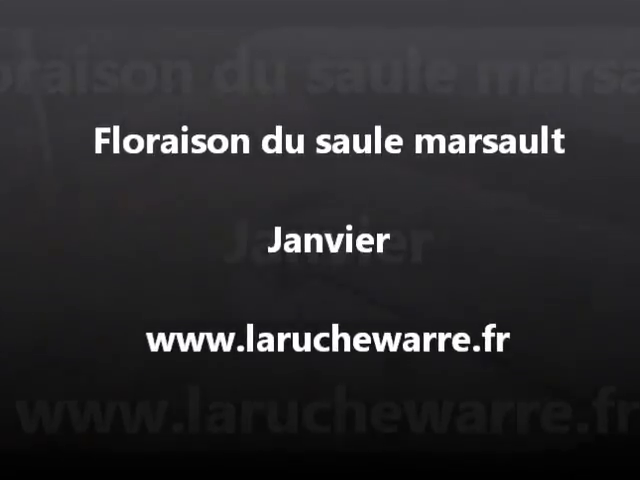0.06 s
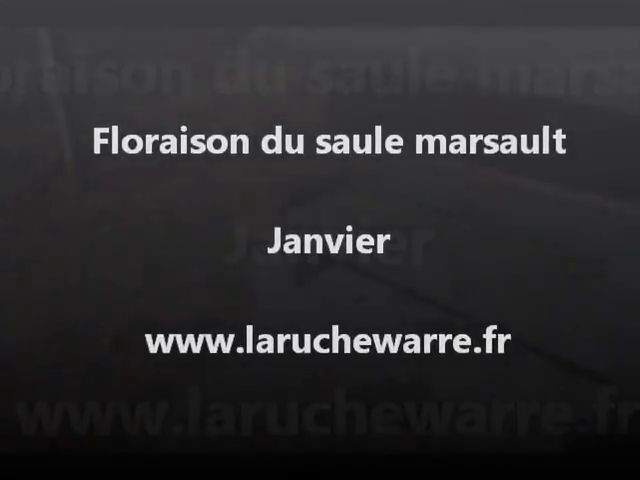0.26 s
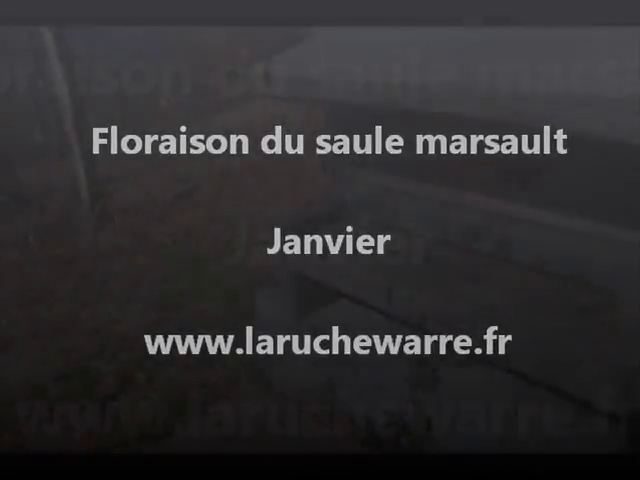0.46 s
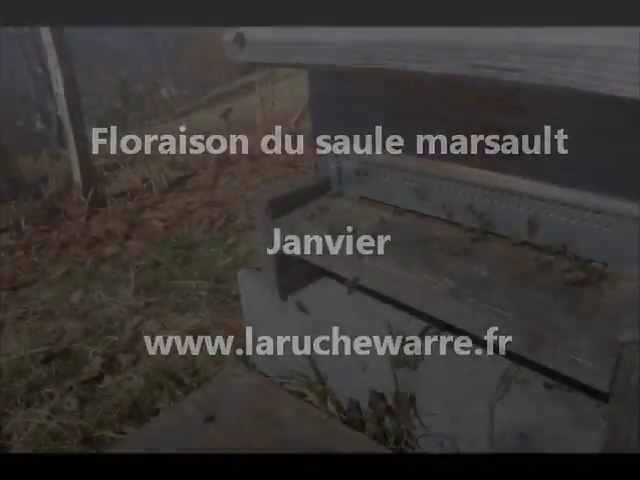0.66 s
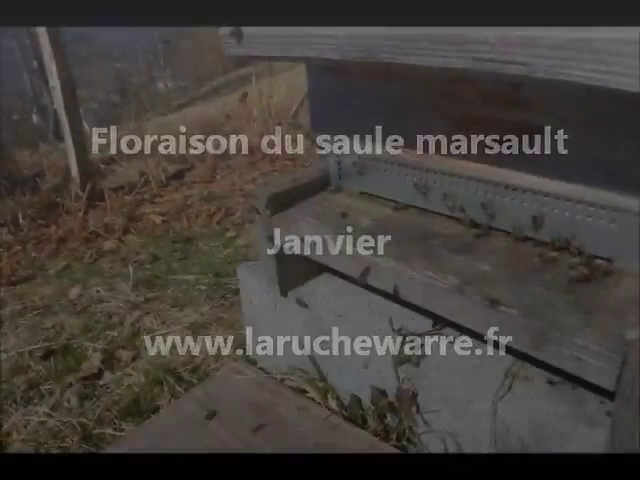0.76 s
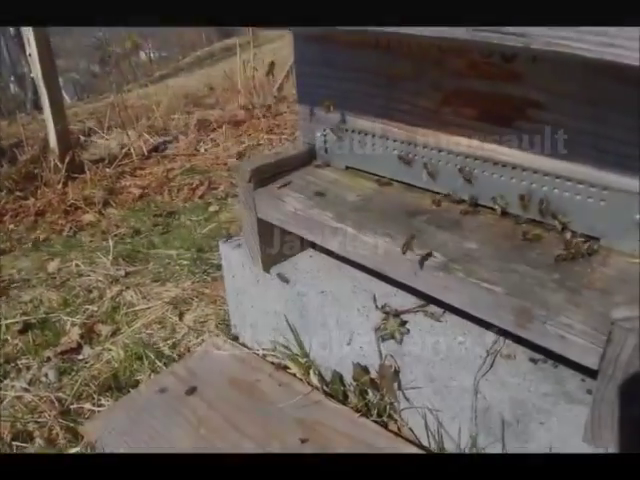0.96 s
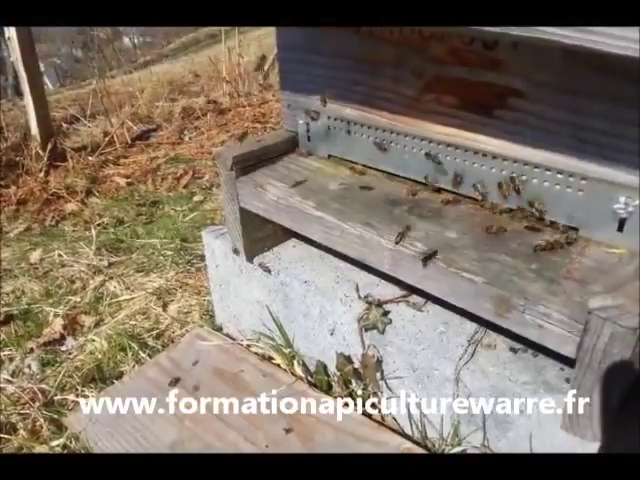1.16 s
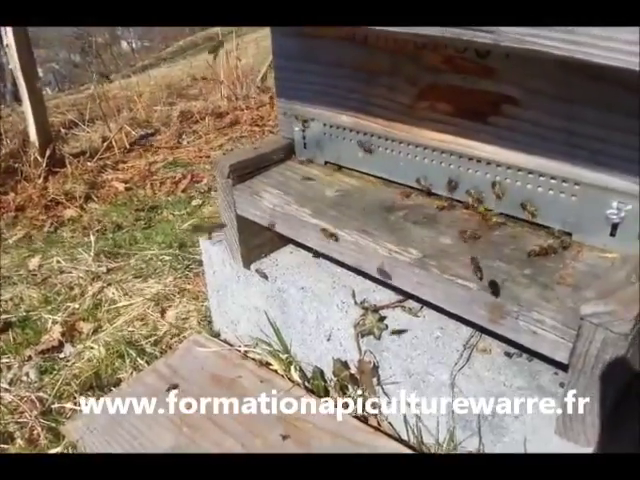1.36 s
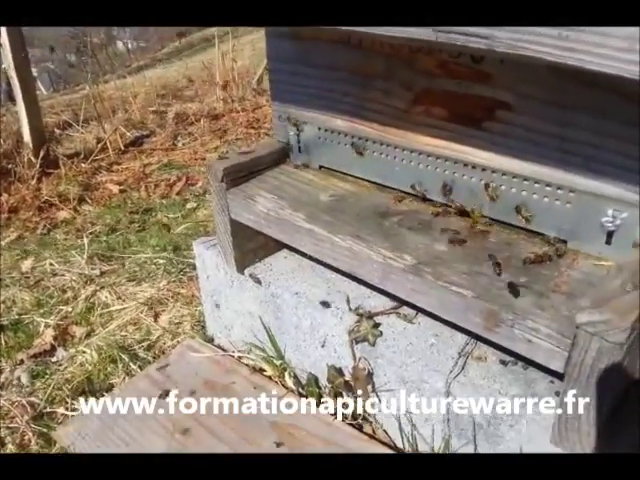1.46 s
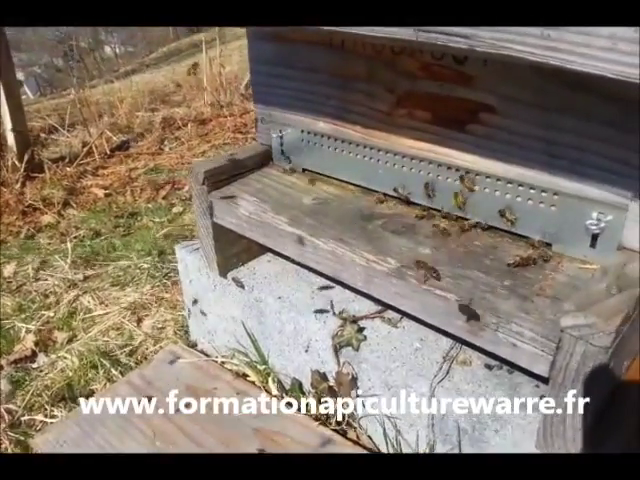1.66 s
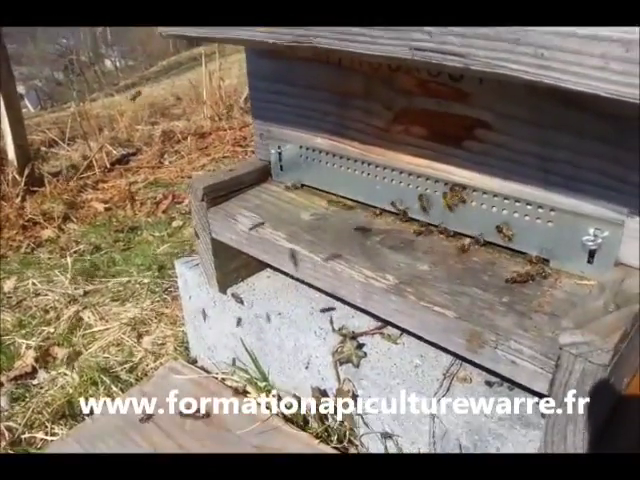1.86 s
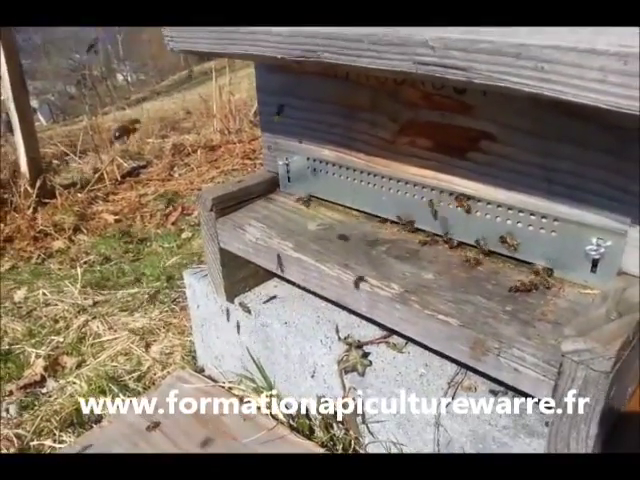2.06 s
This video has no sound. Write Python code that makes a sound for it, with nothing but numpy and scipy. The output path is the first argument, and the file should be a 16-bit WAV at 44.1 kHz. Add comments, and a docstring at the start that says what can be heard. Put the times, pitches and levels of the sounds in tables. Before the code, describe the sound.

Honeybees hum steadily at a wooden hive entrance outdoors, one hovering close and sinking in pitch. Early on, fingers brush, click and rub on the hand-held camera, while light gusts rumble on the microphone over faint hiss.

```python
"""A soft brush on the left and sharp plastic snaps, then honeybees humming at a wooden hive's entrance.
Each bee is a stack of wingbeat harmonics; one hovers close, sinking in pitch, and another joins late.
Fingers click, bump and slide on a small hand-held camera, and puffs of breeze buffet its two microphone
ports. Each port has its own treble resonance, which colours the snaps, the rubbing and the outdoor hiss.
"""
import sys
import numpy as np
from scipy import signal
from scipy.fft import rfft, irfft, next_fast_len
from scipy.io import wavfile
from scipy.ndimage import uniform_filter1d, map_coordinates

SR = 44100
rng = np.random.default_rng(int(sys.argv[2]) if len(sys.argv) > 2 else 0)


def output_pcm(signal):
    """Save a mono or channel-first signal as 16-bit PCM at the path in sys.argv[1].

    Samples are clipped to [-1, 1] before scaling.
    """
    pcm = np.clip(np.atleast_2d(signal).T, -1, 1) * 32767
    wavfile.write(sys.argv[1], SR, np.round(pcm).astype(np.int16))


N = 92610

# fader ride of the colony: t/s, level/dB
COLONY_RIDE = [(.05, -76), (.22, -51.5), (.6, -56), (.82, -53), (.97, -60.5), (1.12, -53), (1.35, -54.5),
               (1.57, -55.5), (1.66, -52.5), (1.9, -57.5), (2.1, -57.5)]
# the nearest bee: t/s, wingbeat/Hz, level/dB
NEAR_FLIGHT = [(.1, 263.8, -68), (.22, 262.3, -66.5), (.48, 271.6, -68), (.56, 278.6, -57),
               (.86, 276.6, -59.5), (1.03, 277.2, -67), (1.27, 266.4, -58.5), (1.45, 259.4, -60.5),
               (1.7, 238.9, -63.5), (1.9, 227.8, -59), (2.02, 225, -59), (2.1, 218.5, -82)]
# a second close bee flying in late: t/s, wingbeat/Hz, level/dB
LATE_FLIGHT = [(1.75, 288, -74), (1.95, 291.6, -69.5), (2.1, 289.7, -60.5)]
# balance of the wing harmonics: f/Hz, level/dB
WING_EQ = [(200, -4), (270, -3), (330, 12), (420, 1.5), (540, 4), (680, -3.5), (900, -3.5), (1250, -3),
           (1650, -9.5), (2200, -18.5), (4000, -21.5), (7000, -26)]
# snaps of the plastic case: t/s, left/dB, right/dB, knock send/dB, ring/Hz
SNAP_CUES = [(.2016, -4.5, -42, 4, 5370), (0.2357, -25.5, -19, -11, 6500), (0.2428, -17, -25.5, 7, 5700),
             (0.3124, -11.5, -13, 8, 7960), (0.3194, -26, -14, 6.5, 6760), (0.3666, -32, -23.5, 7, 6500),
             (0.3811, -20, -12, -10, 6300), (0.3832, -9, -10.5, 2.5, 6800), (0.3856, -9, -1, 4, 6000),
             (0.3879, -1.5, -40, 10, 4500), (0.3982, -10, -10, 14, 7300), (.3996, -14, -28, 20, 4600)]
# bright edge of a snap on the left: f/Hz, level/dB
SNAP_LEFT_EQ = [(200, -14.5), (1500, 0.5), (2500, 5.5), (4200, 7), (5700, 1), (7000, 6), (9500, 0.5),
                (13500, 7.5)]
# bright edge of a snap on the right: f/Hz, level/dB
SNAP_RIGHT_EQ = [(200, -39), (1500, -8), (3500, 5), (5500, 0.5), (7200, 2.5), (9000, 9), (10500, 5.5),
                 (13500, 5.5)]
# dull body under a snap: f/Hz, level/dB
KNOCK_EQ = [(40, -26), (300, 3.5), (800, -0.5), (1400, 0.5), (2600, -6), (8000, -21)]
# soft, low bumps on the right port: t/s, half-length/s, level/dB
THUMP_CUES = [(.4198, 0.0018, -20), (1.2305, 0.0063, -26.5), (1.630, 0.0027, -28), (1.797, 0.0048, -30.5),
              (1.9495, 0.0054, -30)]
# finger strokes on the case: t/s, half-length/s, left/dB, right/dB
RUB_CUES = [(.36, 0.05, -42.5, -45.5), (.51, 0.048, -47.5, -49), (.595, 0.033, -41.5, -42),
            (.68, 0.053, -52, -52), (.76, 0.033, -43.5, -44), (.83, 0.021, -52, -57),
            (.88, 0.0076, -52.5, -54.5), (1.04, 0.022, -60, -58.5), (1.113, 0.011, -50, -52),
            (1.33, 0.017, -60, -57), (1.475, 0.0081, -60, -54.5)]
# tone of skin on plastic: f/Hz, level/dB
RUB_EQ = [(100, -23), (400, 3.5), (800, 6), (1100, 5), (1700, 6.5), (2700, 4), (4200, -1), (7000, 0),
          (10000, -1), (14000, -5.5)]
# tone of the brush past the left port: f/Hz, level/dB
BRUSH_EQ = [(200, -18.5), (900, -4), (2300, -13.5), (3500, -4), (4600, 1), (5600, -5.5), (9000, -2.5),
            (14000, -17)]
# the hollow ringing under a sliding finger: t/s, half-length/s, f/Hz, level/dB
HOLLOW_CUES = [(0.607, 0.034, 2480, -48.5), (0.757, 0.021, 770, -49.5), (0.762, 0.018, 1610, -57.5),
               (0.837, 0.017, 600, -48)]
# puffs of breeze: t/s, half-length/s, left/dB, right/dB
PUFF_CUES = [(.305, 0.017, -47, -34.5), (.38, 0.022, -35, -31), (.425, 0.011, -41, -32.5),
             (.448, 0.015, -62, -37), (.57, 0.015, -67, -36.5), (.745, 0.024, -53, -39.5),
             (.838, 0.012, -57, -34), (1.058, 0.0089, -72, -45.5), (1.145, 0.019, -53, -44),
             (1.225, 0.029, -47, -39), (1.33, 0.031, -38, -42.5), (1.41, 0.013, -39, -48),
             (1.485, 0.017, -44, -55), (1.628, 0.011, -59, -39), (1.663, 0.016, -53, -39),
             (1.785, 0.027, -50, -42.5), (1.845, 0.013, -48, -38), (1.947, 0.015, -45.5, -40.5),
             (1.985, 0.023, -55, -43.5)]
# draught between the puffs: t/s, level/dB
DRAUGHT_RIDE = [(0, -86), (.3, -56.5), (1, -66), (1.25, -60), (2.1, -56)]
# rumble of wind on a port: f/Hz, level/dB
BUFFET_EQ = [(20, -6), (45, -4), (80, 4.5), (130, -1), (200, -6.5), (320, -19), (700, -17.5), (1500, -26),
             (3000, -53.5)]
# outdoor hiss: f/Hz, level/dB
AIR_EQ = [(25, 1), (70, -2.5), (150, -6.5), (330, -1.5), (700, -4.5), (1400, -0.5), (2300, -9), (5000, -12),
          (14000, -9)]
# response of the left microphone port: f/Hz, level/dB
LEFT_PORT_EQ = [(300, -11.5), (900, -14.5), (1500, -10), (2500, -12.5), (4200, -9.5), (4900, -5.5),
                (5450, 1.5), (6300, -6), (7500, -11), (10000, -17.5), (14000, -22)]
# response of the right microphone port: f/Hz, level/dB
RIGHT_PORT_EQ = [(300, -11), (900, -16.5), (1500, -15.5), (2500, -11.5), (4200, -7.5), (5800, -4),
                 (6600, 3), (7150, 5.5), (8200, -2.5), (10000, -9), (14000, -16)]


def colony(count=18, low_hz=202.86, high_hz=272.6, wander=.027, swerve_db=2, sag_per_s=.035):
    """Many bees wander in pitch and distance, blending into a hum that sinks a little."""
    hum = np.zeros((2, N))
    sag = 1 - sag_per_s * (clock() - clock().mean())
    for hz in np.linspace(low_hz, high_hz, count):
        nearness = amp(swerve_db * wobble(4.7))
        wing_hz = hz * sag * (1 + wander * wobble(5))
        hum += nearness * wingbeat(wing_hz, flutter=.011)
    level_db, = curves(COLONY_RIDE)
    return amp(level_db) * unit(hum)


def close_bee(flight, waver_db=1.5):
    """One bee near enough to stand out of the hum as its own tone."""
    wing_hz, level_db = curves(flight)
    return amp(level_db + waver_db * wobble(15)) * wingbeat(wing_hz, flutter=.003)


def wingbeat(wing_hz, flutter, harmonics=22, lag_s=.00017):
    """Fluttering wings make a harmonic buzz that reaches the two ports a little apart."""
    lag = lag_s * wobble(1)
    hz = wing_hz * (1 + flutter * wobble(35))
    phase = 2 * np.pi * np.cumsum(hz) / SR
    offsets = rng.uniform(0, 2 * np.pi, harmonics)
    buzz = unit(sum(eq_gain(WING_EQ, k * hz.mean()) * np.sin(k * phase + offset)
                    for k, offset in enumerate(offsets, 1)))
    return np.array([np.interp(clock() + side * lag / 2, clock(), buzz) for side in (1, -1)])


def snaps(scrape=.3, scrape_t60_s=.0045, ring_db=3.5, trim_db=-.5):
    """The case snaps: a sharp push and a tiny scrape drive a bright ring and a dull knock."""
    edges, knocks = np.zeros((2, N)), np.zeros((2, N))
    t = np.arange(SR // 50) / SR
    for s, left_db, right_db, knock_db, hz in SNAP_CUES:
        push = scrape * rng.standard_normal((2, len(t))) * amp(-60 * t / scrape_t60_s)
        push[:, 0] = 1  # the attack
        push *= amp([[left_db], [right_db]])
        start = round(s * SR)
        span = slice(start, start + len(t))
        edges[:, span] += push + amp(ring_db) * ring(push, hz, q=8.2)
        knocks[:, span] += amp(knock_db) * push
    bright = np.array([colour(edges[0], SNAP_LEFT_EQ), colour(edges[1], SNAP_RIGHT_EQ)])
    return amp(trim_db) * (bright + colour(knocks, KNOCK_EQ))


def thumps():
    """Each bump on the right port is one soft push with a rebound before and after."""
    bumps = np.zeros(N)
    for s, half_s, db in THUMP_CUES:
        u = (clock() - s) / half_s
        bumps += amp(db) * (1 - 2 * u ** 2) * np.exp(-u ** 2)
    return np.outer([0, 1], bumps)


def tick(at_s=1.1113, hz=1780, half_s=.00041, level_db=-27.5):
    """One light, woody tap of about two cycles."""
    t = clock() - at_s
    return amp(level_db) * np.exp(-(t / half_s) ** 2) * np.sin(2 * np.pi * hz * t)


def rubbing(grains_per_s=900, grit_mix=.55, roughness_db=1.5, trim_db=-1):
    """Skin slides over the case, catching on tiny grains."""
    grains = rng.standard_normal((2, N)) * (rng.random(N) < grains_per_s / SR)
    friction = unit(noise(RUB_EQ) + grit_mix * unit(colour(grains, RUB_EQ)))
    return swells(RUB_CUES) * amp(trim_db + roughness_db * wobble(450)) * friction


def brush(start_s=.045, end_s=.108, attack_s=.0029, release_s=.014, level_db=-43.5):
    """Skin brushes past the left port in one short, bright swish."""
    attack = np.clip((clock() - start_s) / attack_s, 0, 1)
    release = np.exp(-np.maximum(clock() - end_s, 0) / release_s)
    return np.outer([1, 0], amp(level_db) * attack * release) * noise(BRUSH_EQ)


def hollows():
    """Friction rings the gap between finger and case, at a new pitch with each grip."""
    rings = np.zeros((2, N))
    for s, half_s, hz, db in HOLLOW_CUES:
        cavity = unit(ring(rng.standard_normal((2, N)), hz, q=7))
        rings += swells([(s, half_s, db, db)]) * cavity
    return rings


def breeze(leveller_s=.034):
    """Puffs buffet each port with low rumble, over a weak draught."""
    eddies = noise(BUFFET_EQ)
    power = np.abs(uniform_filter1d(eddies ** 2, int(leveller_s * SR)))
    eddies /= np.sqrt(power + 1e-6)  # levelled, so the puffs set the dynamics
    draught_db, = curves(DRAUGHT_RIDE)
    return eddies * np.hypot(swells(PUFF_CUES), amp(draught_db))


def air(level_db=-57, waver_db=1.23):
    """A bed of outdoor hiss that wavers a little."""
    return amp(level_db - waver_db * wobble(14.13)) * noise(AIR_EQ)


def amp(db):
    """Decibels to gain."""
    return 10 ** (np.asarray(db) / 20)


def unit(x):
    """Scale to rms 1."""
    return x / np.sqrt(np.mean(x ** 2) + 1e-20)


def clock():
    """Time of each sample in seconds."""
    return np.arange(N) / SR


def curves(rows):
    """One automation curve for each column after the time."""
    times, *columns = np.transpose(rows)
    return [np.interp(clock(), times, column) for column in columns]


def swells(cues):
    """Left and right gain of bell-shaped swells, summed in power."""
    return np.sqrt(sum(amp([[left_db], [right_db]]) ** 2 * np.exp(-((clock() - s) / half_s) ** 2)
                       for s, half_s, left_db, right_db in cues))


def wobble(knots_per_s):
    """Smooth random modulation."""
    return map_coordinates(rng.standard_normal(N // 8), [clock() * knots_per_s + 2], mode="wrap")


def eq_gain(eq, hz):
    """Gain of an EQ curve at hz, on a log frequency axis."""
    points_hz, db = np.transpose(eq)
    return amp(np.interp(np.log(hz + 1), np.log(points_hz + 1), db))


def colour(x, eq):
    """Minimum-phase EQ: nothing rings ahead of an attack."""
    size = 2 * next_fast_len(N)
    cepstrum = irfft(np.log(eq_gain(eq, np.fft.rfftfreq(size, 1 / SR))))
    cepstrum[1:size // 2] *= 2
    cepstrum[size // 2 + 1:] = 0
    return irfft(rfft(x, size) * np.exp(rfft(cepstrum)), size)[..., :N]


def noise(eq):
    """Coloured noise of rms 1, unrelated between the ports."""
    return unit(colour(rng.standard_normal((2, N)), eq))


def ring(x, hz, q):
    """One band-pass resonance."""
    return signal.lfilter(*signal.iirpeak(hz, q, fs=SR), x)


def scene():
    """The dry mix at the two ports: bees, handling, breeze and hiss."""
    handling = rubbing() + brush() + hollows() + snaps() + thumps() + tick()
    bees = colony() + close_bee(NEAR_FLIGHT) + close_bee(LATE_FLIGHT)
    return bees + handling + breeze() + air()


def record(dry, gain_db=10, low_cut_hz=35, start_s=.039, fade_s=.017, top_hz=15200, taper_hz=1100):
    """The ports colour the mix; the camera cuts the deepest bass, fades in, clips and rolls off the top."""
    heard = amp(gain_db) * np.array([colour(dry[0], LEFT_PORT_EQ), colour(dry[1], RIGHT_PORT_EQ)])
    heard = signal.sosfilt(signal.butter(2, low_cut_hz, "high", fs=SR, output="sos"), heard)
    heard *= np.clip((clock() - start_s) / fade_s, 0, 1)
    heard = np.clip(heard, -.9, .9)
    size = 2 * next_fast_len(N)
    high_cut = np.clip((top_hz - np.fft.rfftfreq(size, 1 / SR)) / taper_hz, 0, 1)
    return irfft(rfft(heard, size) * high_cut, size)[:, :N]


dry = scene()
out = record(dry)
output_pcm(out)
```